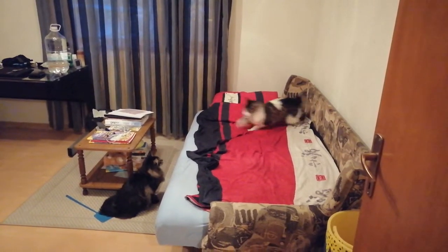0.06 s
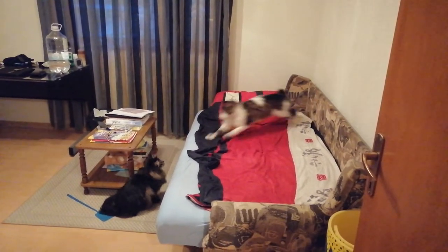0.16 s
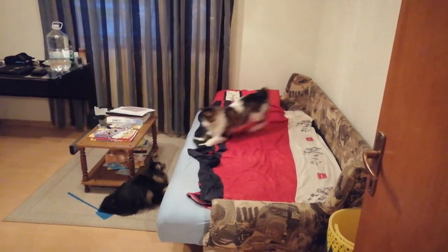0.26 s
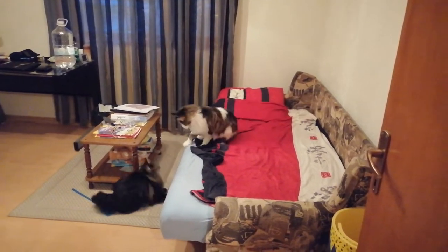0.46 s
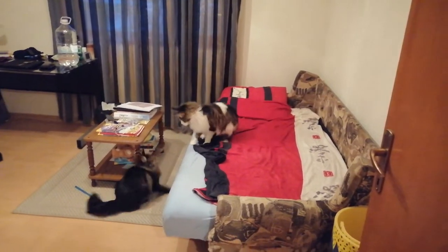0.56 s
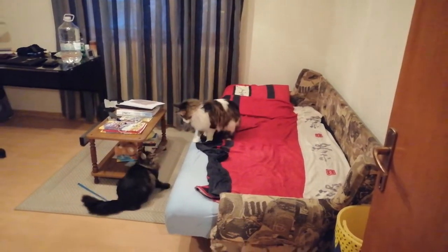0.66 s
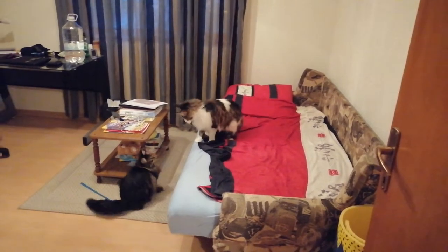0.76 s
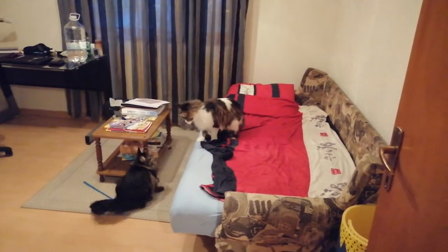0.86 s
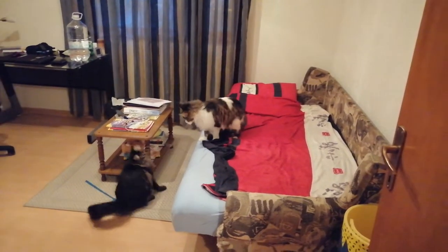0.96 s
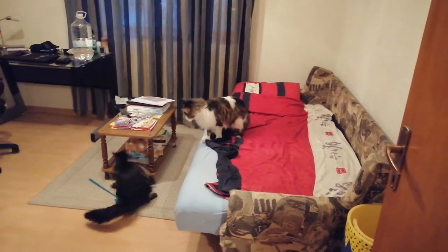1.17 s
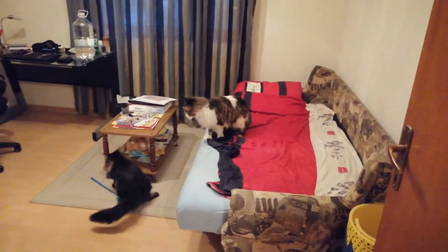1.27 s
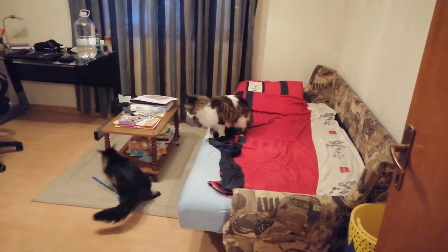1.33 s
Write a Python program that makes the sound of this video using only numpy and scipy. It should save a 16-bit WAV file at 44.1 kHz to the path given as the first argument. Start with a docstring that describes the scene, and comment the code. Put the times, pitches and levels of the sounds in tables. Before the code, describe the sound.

A cat bounds across a bed with dull thuds and a soft rustle of covers.

```python
"""A cat bounds across a bed in a quiet bedroom: push-off, front paws down, then hind paws.
The paws jolt the mattress in two clusters of dull thuds, the wooden frame clacks under the push,
and the cover rustles. The bed sits centred before a stereo microphone. The small room answers briefly,
over a steady low rumble and a faint hiss from the left."""
import sys
import numpy as np
from scipy import signal
from scipy.fft import rfft, irfft, next_fast_len
from scipy.io import wavfile
from scipy.ndimage import map_coordinates

SR = 44100
rng = np.random.default_rng(int(sys.argv[2]) if len(sys.argv) > 2 else 0)


def to_wav(s):
    """Save 16-bit WAV."""
    ch = np.atleast_2d(s).T  # columns
    pcm = np.round(np.clip(ch, -1, 1) * 32767)  # PCM
    wavfile.write(sys.argv[1], SR, pcm.astype(np.int16))


N = 61739

# how alike the mattress sounds left and right: frequency_hz, correlation
MATTRESS_CORRELATION = [(50, 1), (130, 0.97), (260, 0.91), (500, 0.15), (1500, 0.059)]


def paw_thuds():
    """Each jolt of a paw is a thud that the padding kills in a few swings; it sets the bed ringing."""
    # jolts, low for a soft sinking, high for a sharp jab: start_s, level_db, pitch_hz
    jolts = [(0.059, -46, 178), (0.229, -38, 69), (0.264, -28, 208.3), (.279, -31, 204), (.298, -39.5, 276),
             (.312, -32, 138), (.329, -28, 163), (.427, -34, 295), (.448, -33.5, 232), (.477, -30, 112),
             (0.502, -43.5, 186), (.523, -40.5, 143.7), (0.746, -53.5, 99)]
    # resonances of mattress and frame: frequency_hz, gain_db, t60_s
    bed_modes = [(65, -22, .25), (108, -19, .28), (150, -27, .2), (201, -20, .2), (277, -23, .22),
                 (332, -26, .12), (386, -27, .18), (501, -29, .25)]
    rise_cycles, t60_cycles, ring_attack_s = 0.69, 10.3, 0.0091
    thuds = np.zeros(N)
    for start_s, level_db, pitch_hz in jolts:
        t = since(start_s)
        cycles = pitch_hz * t
        rise = 1 - np.exp(-(cycles / rise_cycles) ** 2)
        thud = np.sin(2 * np.pi * cycles) * fade(cycles, t60_cycles) * rise
        ring = np.zeros(N)
        for hz, gain_db, t60_s in bed_modes:
            # a soft jolt barely stirs the modes above its own pitch
            drive = amp(gain_db + rng.normal(0, 1)) / np.hypot(1, (hz / pitch_hz) ** 2)
            ring += drive * fade(t, t60_s) * np.sin(2 * np.pi * hz * t)
        thuds += amp(level_db) * (thud + ring * (1 - np.exp(-t / ring_attack_s)))
    return thuds + amp(-23) * bedroom_tail(thuds)


def mattress_shudder():
    """The padding shudders dully while the cat's weight works on it, then dies away."""
    # strength of the shudder: time_s, relative_db
    load_curve = [(0.209, -70), (.25, -54.5), (0.271, -38.5), (0.336, -39.5), (.36, -50.5), (0.416, -47),
                  (.435, -42), (.49, -43.5), (0.547, -50), (.575, -64), (0.661, -64.5)]
    # spectrum of the padding: frequency_hz, gain_db
    padding = [(25, -32), (55, -1.5), (120, 0.5), (210, -1), (290, -3), (370, -15), (440, -27.5),
               (900, -63)]
    time_s, relative_db = np.transpose(load_curve)
    load = amp(np.interp(since(0), time_s, relative_db) - 2)
    release = fade(since(time_s[-1]), t60=0.66)
    return load * release * coloured(rng.standard_normal((2, N)), padding, MATTRESS_CORRELATION)


def frame_clacks():
    """The wooden frame clacks under load: a noisy crack and ringing wood, carried on by the room."""
    # clacks of the frame: start_s, level_db
    clacks = [(.258, -39), (0.273, -58.5), (.291, -54), (.482, -53.5)]
    # resonances of the wood: frequency_hz, gain_db, t60_s
    wood_modes = [(944, -17, .09), (1303, -4, .02), (1530, -15, .06), (1704, -13, .17), (1757, -13, .16),
                  (1870, -7, .05), (2008, -11, .14), (2124, -9, .08), (2260, -3, .025)]
    # spectrum of the crack: frequency_hz, gain_db
    crack_spectrum = [(300, -47), (800, 16.5), (2300, -1.5), (3200, 3), (6000, -17.5), (11000, -24),
                      (15000, -39)]
    attack_s = 0.002
    wood = np.zeros(N)
    for start_s, level_db in clacks:
        t = since(start_s)
        ring = np.zeros(N)
        for hz, gain_db, t60_s in wood_modes:
            drive = amp(gain_db + rng.normal(0, 1))
            ring += drive * fade(t, t60_s) * np.sin(2 * np.pi * (hz * t + rng.random()))
        noise = filtered(rng.standard_normal(N), lambda hz: amp(along(crack_spectrum, hz)))
        crack = amp(-9) * fade(t, t60=0.035) * unit(noise)
        wood += amp(level_db) * (ring + crack) * (1 - np.exp(-(t / attack_s) ** 2))
    return wood + amp(0.5) * bedroom_tail(wood)


def cover_swish():
    """The cover is dragged along and swishes through the whole bound."""
    # how hard it is dragged: time_s, relative_db
    drag_curve = [(0.2, -96), (0.222, -100), (0.236, -102), (0.256, -85), (0.362, -74.5), (0.37, -79),
                  (0.516, -73.5), (0.58, -86), (0.61, -97), (0.62, -100)]
    # spectrum of sliding cloth: frequency_hz, gain_db
    swish_spectrum = [(200, -20), (600, -5), (1900, -8), (2700, 8.5), (4200, -3), (7000, -2.5), (8300, -9),
                      (11800, -8.5), (12800, -34), (15500, -33)]
    edge_s = 0.034
    t = since(0)
    time_s, relative_db = np.transpose(drag_curve)
    outside_s = np.maximum(time_s[0] - t, 0) + since(time_s[-1])
    drag = amp(np.interp(t, time_s, relative_db) + 9) * np.exp(-outside_s / edge_s)
    return drag * cloth_slips(swish_spectrum)


def duvet_crumple():
    """The duvet crumples dully each time the cat's weight comes on it."""
    # swells of weight: peak_s, level_db, rise_s, fall_s
    crushes = [(0.287, -52.5, 0.017, 0.063), (.486, -52.5, 0.054, 0.054)]
    # spectrum of the crumpling: frequency_hz, gain_db
    duvet_spectrum = [(200, -32), (480, -2), (700, -3.5), (960, 0), (1250, -4.5), (1600, 1), (2050, -2),
                      (2700, -12), (4200, -20), (9000, -35)]
    roundness = 1.34  # 1 = pointed swell, 2 = bell
    t = since(0)
    weight = np.zeros(N)
    for peak_s, level_db, rise_s, fall_s in crushes:
        width_s = np.where(t < peak_s, rise_s, fall_s)
        weight += amp(level_db) * np.exp(-np.abs((t - peak_s) / width_s) ** roundness)
    return weight * cloth_slips(duvet_spectrum)


def cloth_slips(spectrum):
    """Dense tiny slips of cloth merge into a slightly uneven rustle, rms near 1."""
    # how alike cloth sounds left and right: frequency_hz, correlation
    correlation = [(400, 0), (1200, 0.41), (3000, 0.13), (10000, 0.024)]
    slips_per_s, spread_db, roughness_db = 13000, 0.5, 0.5
    slipping = rng.random((2, N)) < slips_per_s / SR
    slips = slipping * rng.standard_normal((2, N)) * amp(spread_db * rng.standard_normal((2, N)))
    return amp(roughness_db * wobble(90)) * coloured(slips, spectrum, correlation)


def mattress_murmur():
    """The mattress murmurs under the cat's shifting weight, less as it settles."""
    # spectrum of the murmur: frequency_hz, gain_db
    spectrum = [(25, -18.5), (60, 9), (110, 5), (170, 5.5), (260, -14.5), (420, -15), (800, -70)]
    start_db, fall_db_per_s, sway_db = -62.5, 10.5, 1.2
    level_db = start_db - fall_db_per_s * since(0) + sway_db * wobble(10)
    return amp(level_db) * coloured(rng.standard_normal((2, N)), spectrum, MATTRESS_CORRELATION)


def bedroom_tail(sound):
    """The small room's short reverberation, different on each side; the treble dies first."""
    # decay of the room: frequency_hz, t60_s
    decay_times = [(100, 0.73), (1000, 0.4), (2000, 0.27), (10000, 0.12)]
    delay_s = 0.009
    band_hz, t, bands = signal.stft(rng.standard_normal((2, SR // 2)), SR, nperseg=256)
    decay = fade(t, along(decay_times, band_hz)[:, None])
    tail = signal.istft(bands * decay, SR, nperseg=256)[1]
    wet = signal.fftconvolve(sound[None], tail / np.linalg.norm(tail[0]), axes=1)[:, :N]
    return filtered(wet, lambda hz: np.exp(-2j * np.pi * hz * delay_s))


def room_tone():
    """Steady noise of the quiet bedroom: a centred rumble, diffuse higher up."""
    # spectrum of the room tone: frequency_hz, gain_db
    spectrum = [(20, -3.5), (50, 1), (100, -5), (160, -13), (250, -14), (500, -21), (750, -23.5),
                (1000, -19.5), (1350, -20.5), (2100, -18), (3100, -24), (4300, -29), (5900, -28),
                (8200, -38), (10500, -38), (15500, -41.5)]
    # how alike it is left and right: frequency_hz, correlation
    correlation = [(50, 1), (130, 0.89), (260, 0), (500, 0), (1500, 0.062), (12000, 0)]
    return amp(-64.5) * coloured(rng.standard_normal((2, N)), spectrum, correlation)


def left_hiss():
    """A faint hiss from the left, which reaches the right side of the microphone later."""
    # spectrum of the hiss: frequency_hz, gain_db
    spectrum = [(150, -9.5), (450, 8.5), (700, -2.5), (2100, -4.5), (4000, -16), (8000, -16), (15000, -26)]
    lags_s = [0, 0.000566]  # left, right
    hiss = filtered(rng.standard_normal(N),
                    lambda hz: amp(along(spectrum, hz)) * np.exp(-2j * np.pi * np.outer(lags_s, hz)))
    return amp(-77) * unit(hiss)


def amp(db):
    """Decibels to gain."""
    return 10 ** (np.asarray(db) / 20)


def unit(x):
    """Scale to rms 1."""
    return x / np.sqrt(np.mean(x ** 2) + 1e-20)


def along(points, hz):
    """Interpolate (frequency_hz, value) points on a log frequency axis."""
    point_hz, values = np.transpose(points)
    return np.interp(np.log(hz + 1), np.log(point_hz + 1), values)


def since(start_s):
    """Seconds since start_s, zero before it."""
    return np.maximum(np.arange(N) / SR - start_s, 0)


def fade(t, t60):
    """Decay by 60 dB in t60."""
    return np.exp(-np.log(1000) * t / t60)


def wobble(knots_per_s):
    """A smooth random curve."""
    return map_coordinates(rng.standard_normal(N // 20), [np.arange(N) * knots_per_s / SR], mode="wrap")


def filtered(x, response):
    """Filter x by a response given as a function of frequency."""
    size = next_fast_len(N + SR // 2)
    return irfft(rfft(x, size) * response(np.fft.rfftfreq(size, 1 / SR)), size)[..., :N]


def coloured(pair, spectrum, correlation):
    """Mix two unrelated signals to stereo of rms 1 with this spectrum and left-right correlation."""
    def mid_side_gains(hz):
        angle = np.arccos(np.clip(along(correlation, hz), -1, 1)) / 2
        return amp(along(spectrum, hz)) * [np.cos(angle), np.sin(angle)]
    mid, side = filtered(pair, mid_side_gains)
    return unit(np.array([mid + side, mid - side]))


def scene():
    """The cat's bound over the background of the bedroom."""
    bound = paw_thuds() + mattress_shudder() + frame_clacks() + cover_swish() + duvet_crumple()
    return bound + mattress_murmur() + room_tone() + left_hiss()


def record(dry):
    """The microphone chain passes nothing above its band limit."""
    return filtered(dry, lambda hz: hz < 15700)


dry = scene()
out = record(dry)
to_wav(out)
```